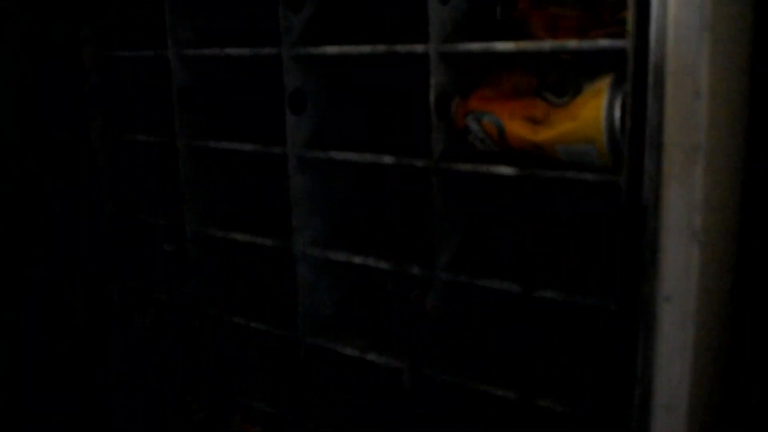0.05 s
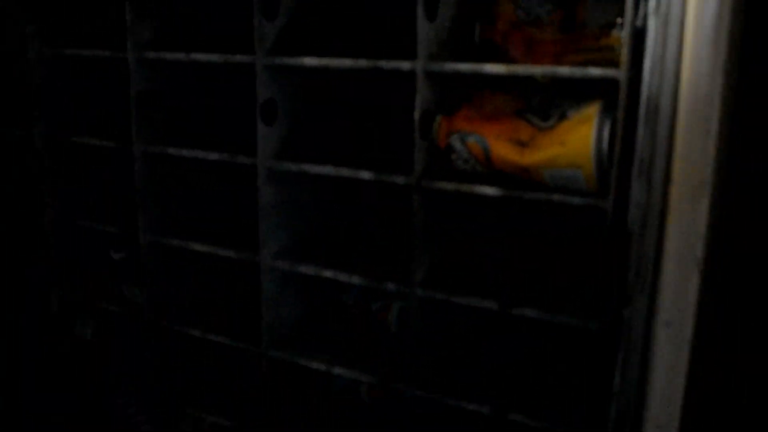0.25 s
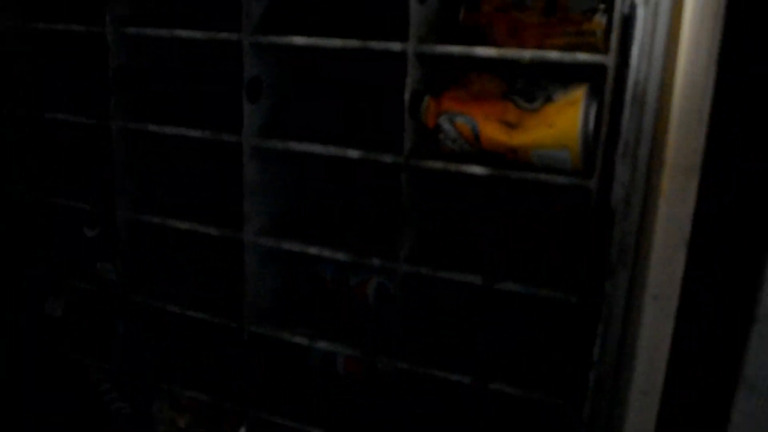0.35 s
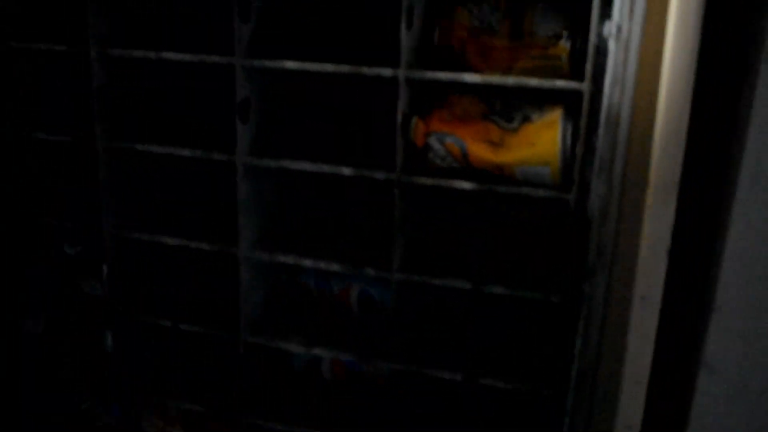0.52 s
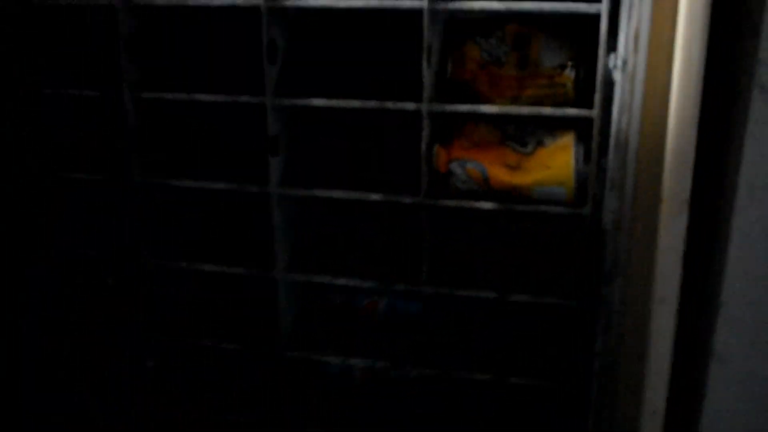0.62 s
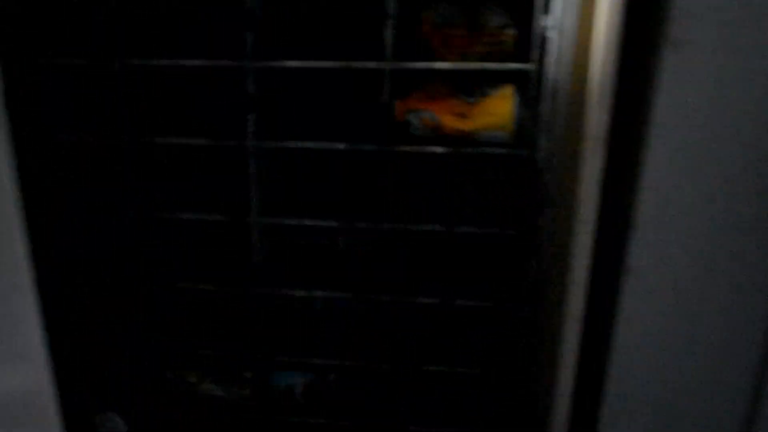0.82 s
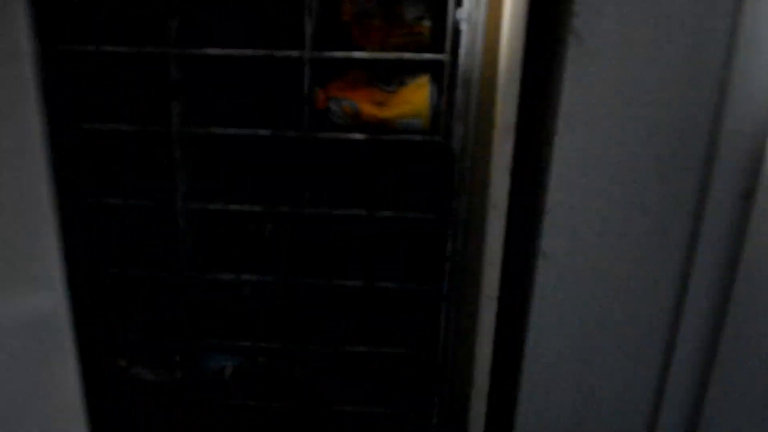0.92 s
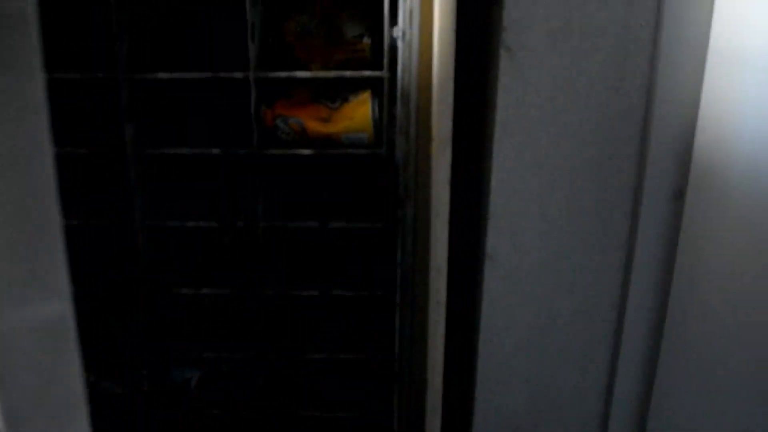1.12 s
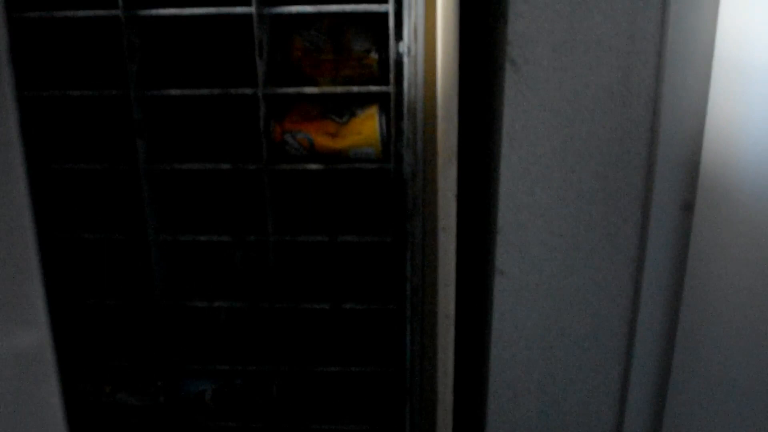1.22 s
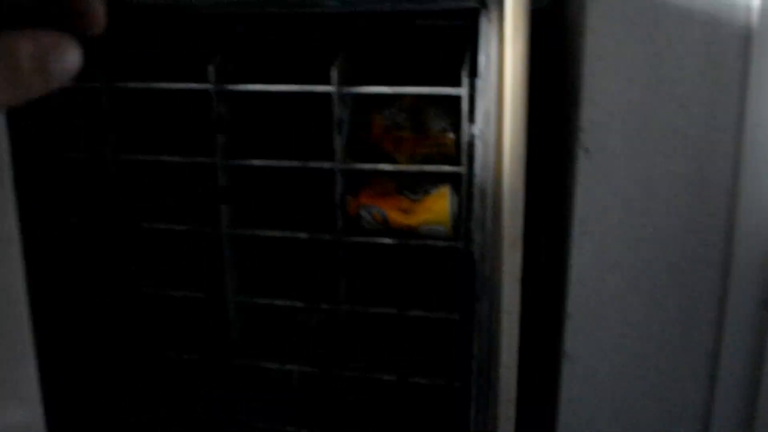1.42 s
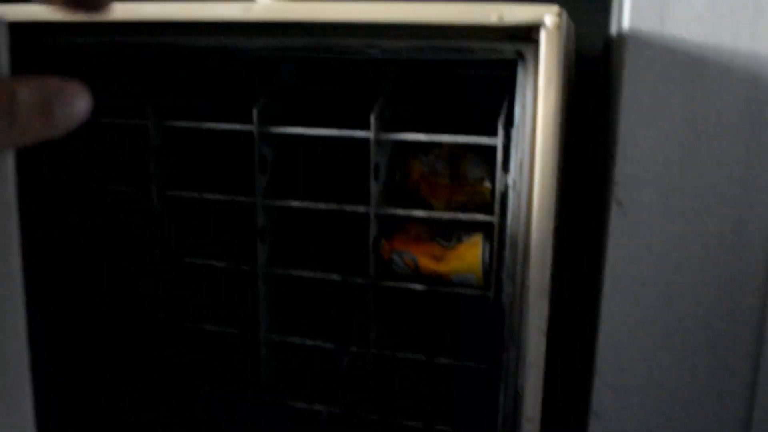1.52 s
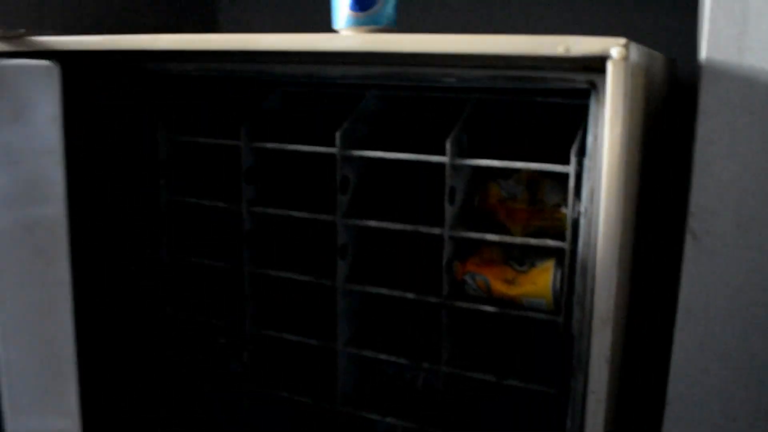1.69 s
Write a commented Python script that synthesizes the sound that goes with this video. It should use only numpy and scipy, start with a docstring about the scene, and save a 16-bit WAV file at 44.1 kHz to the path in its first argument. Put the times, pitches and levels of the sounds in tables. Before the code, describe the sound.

Two ringing clanks from a metal cabinet door break into a quick clatter, with a rattling wire rack and a low rumble. The rack then knocks lightly and the door taps softly, dying away in a big empty room.

```python
"""A sheet-metal cabinet door is knocked twice and chatters against its frame, each blow making it ring.
From the first knock on, the wire rack inside rattles, and high metallic tinks come now and then.
After about a second the rack knocks on its rail, and the held door gives soft, hollow taps.
A large bare room rings after it all, over the low rumble of the shaking cabinet and a faint hiss."""
import sys
import numpy as np
from scipy import signal
from scipy.fft import rfft, irfft, next_fast_len
from scipy.io import wavfile
from scipy.ndimage import uniform_filter1d

SR = 44100
rng = np.random.default_rng(int(sys.argv[2]) if len(sys.argv) > 2 else 0)


def wrap_up_sound(samples):
    """Save the sound to the file named by the first command line argument, as 16-bit audio."""
    columns = np.atleast_2d(samples).T
    # keep every value between -1 and 1, then stretch to whole-number steps
    tamed = np.clip(columns, -1, 1)
    steps = np.round(tamed * 32767).astype(np.int16)
    wavfile.write(sys.argv[1], SR, steps)


N = 77175
ATTACK_S = 0.00098  # how fast clatter and rail knocks start
SCATTER_DB = 1.5  # how much a tone's level varies from hit to hit


def door_ring(blows):
    """Each blow rings the door's own tones; touching the frame or hand stops low tones soonest."""
    # For each tone: pitch in Hz, level in dB, fade time (t60, the seconds it takes to drop 60 dB).
    door_hz = [241, 521, 633, 874, 1001, 1076, 1231, 1440, 1494, 1577, 1698, 1797, 1844, 1911, 1961, 2076,
               2459, 3890]
    door_db = [-11.5, 1.5, 5.5, -0.5, -2.5, 1.5, -1.5, -10.5, -10, -3.5, 2.5, -2.5, 2.5, -12.5, -3, 0, -14,
               -9]
    door_t60 = [0.14, 0.058, 0.7, 0.25, 0.13, 0.068, 1, 0.71, 0.99, 0.2, 0.15, 0.17, 0.15, 0.57, 0.1, 0.11,
                0.25, 0.07]
    # The two borders between low, middle and high tones, in Hz.
    borders_hz = [750, 1750]
    out, t = np.zeros(N), np.arange(SR // 4) / SR
    hz, db, t60 = np.array([door_hz, door_db, door_t60])[:, :, None]
    tones = amp(db - 60 * t / t60) * np.sin(2 * np.pi * hz * t) * np.sqrt(1 - t / t.max())
    band = np.searchsorted(borders_hz, door_hz)
    loss = (hz / borders_hz[0]) ** -0.96 * t
    for start, *band_db, _, damping, spot_hz in blows:
        # The spot that is struck lifts the tones near one pitch.
        lift_db = 10 * np.exp(-(np.log2(hz[:, 0] / spot_hz) / .025) ** 2)
        gains = amp(np.array(band_db)[band] + lift_db + SCATTER_DB * rng.standard_normal(len(hz)))
        rise_cycles = 0.11 + 0.61 * abs(max(band_db))  # softer blows swell more slowly
        rise = 1 - np.exp(-t * hz / rise_cycles)
        add(out, start, gains @ (tones * amp(-damping * loss) * rise))
    return out


def door_clatter(blows):
    """Each blow also wakes its own mix of tones, packed so closely that they sound like noise."""
    # Each row: frequency in Hz, level of the clatter in dB.
    spectrum = [(130, -52), (250, -16), (420, -16), (620, -2), (1200, -5), (1870, -3.5), (2600, -3.5),
                (4050, -7.5), (7000, -20.5), (15000, -52.5)]
    # Each row: frequency in Hz, fade time in seconds.
    fade_times = [(200, 0.12), (1500, 0.45), (5000, 0.15), (14000, 0.47)]
    out, t = np.zeros(N), np.arange(SR // 4) / SR
    bursts = noise(spectrum, (len(blows), len(t)))
    bursts = unit(filtered(bursts, lambda hz: amp(5 * wobble((len(blows), len(hz)), width=8))))
    bursts = fade_bands(bursts, fade_times) * (1 - np.exp(-t / ATTACK_S))
    for (start, *_, clatter_db, _, _), burst in zip(blows, bursts):
        add(out, start, amp(clatter_db) * burst)
    return out


def door():
    """The door is knocked and bounces on its frame, giving a ring and a clatter."""
    # Each row: start in seconds, strength of the low, middle and high tones in dB, clatter in dB,
    # extra fading from contact in dB per second at 750 Hz, lifted pitch in Hz.
    blows = [(.2005, -7, -22, -28, -20, 500, 521), (.211, -9, -27.5, -18.5, -25, 120, 874),
             (.239, -12.5, -19.5, -13.5, -22, 114, 1820), (.262, -33, -25, -18, -31, 152, 1860),
             (0.284, -15.5, -38.5, -21, -39.5, 152, 1231), (.361, -48, -28.5, -39, -50, 397, 633),
             (0.412, -47, -30, -37, -31.5, 300, 1844), (.4355, -13.5, -15.5, -6.5, -10, 617, 1076),
             (.458, -32.5, -13, -14, -18.5, 305, 1844), (.478, -29, -17, -26, -21, 300, 874),
             (.5, -12.5, -15, -10.5, -17.5, 395, 1961), (.522, -57, -17.5, -19, -24, 300, 1844),
             (.546, -16, -14.5, -16.5, -21.5, 195, 1001), (.577, -16, -15, -22.5, -26.5, 151, 1001),
             (.6, -13, -21.5, -21.5, -26, 294, 1577), (0.62, -45, -33, -27, -35, 304, 1231),
             (.645, -30.5, -26, -56, -36, 200, 1540), (.67, -38.5, -28, -47, -46, 153, 633),
             (.731, -52, -41, -44, -38.5, 196, 2076), (.762, -28, -31, -59, -39, 307, 1001),
             (.803, -62, -42, -58, -34.5, 214, 874)]
    return door_ring(blows), door_clatter(blows)


def door_taps():
    """Soft taps on the held door swell into three hollow tones; the hand shifts the lower two."""
    # Each row: start in seconds, level in dB, dB added to tones two and three, first two pitches in Hz.
    taps = [(1.098, -29.5, -5.5, 648, 926), (1.18, -32.5, -20, 492, 1047), (1.222, -33.5, -33, 650, 900),
            (1.243, -30, -9, 650, 898), (1.436, -31, -3.5, 666, 897), (1.547, -35.5, -27, 653, 922),
            (1.573, -36, -11, 634, 485), (1.716, -40, 4.5, 615, 946)]
    out, t = np.zeros(N), np.arange(SR // 4) / SR
    rise = 1 - np.exp(-(t / 0.0054) ** 2)
    for start, level_db, others_db, first_hz, second_hz in taps:
        db = level_db + np.array([4.5, 6.5 + others_db, -5 + others_db])
        add(out, start, ring([first_hz, second_hz, 1229], db, t60=[0.059, 0.058, 0.37], t=t) * rise)
    return out


def wire_rattles():
    """The rack's wires rattle: grainy noise that holds for a moment, then fades."""
    # Each row: start in seconds, level in dB, hold and fade times in seconds, tilt in dB per octave.
    rattles = [(0.202, -26.5, 0.003, 0.39, -5.5), (0.368, -38.5, .01, 1, -7),
               (0.442, -19.5, 0.0045, 0.078, -7), (0.546, -42, 0.024, 0.15, 6),
               (0.619, -32.5, 0.0068, 0.13, -3), (0.667, -31.5, 0.018, 0.25, -1.5),
               (0.724, -29.5, 0.01, 0.19, -8), (0.792, -34.5, 0.029, 0.27, -0.5),
               (0.837, -52, 0.0077, 0.12, -12), (0.883, -40, 0.019, 0.32, -8.5),
               (0.922, -36.5, 0.0017, 0.13, -2), (0.971, -43.5, 0.0044, 0.12, -4),
               (1.376, -53, 0.013, 0.23, -2), (1.407, -42.5, 0.025, 0.093, -9)]
    # Each row: frequency in Hz, level of the rattle in dB.
    spectrum = [(1500, -4.5), (3200, -4), (7000, -3), (11600, -7.5), (15800, -17)]
    out, t = np.zeros(N), np.arange(SR // 6) / SR
    for start, db, hold, t60, tilt_db in rattles:
        grain = amp(2.5 * wobble(len(t), width=60))
        loudness = amp(db - 60 * np.maximum(t - hold, 0) / t60) * (1 - np.exp(-t / 0.0014))
        add(out, start, loudness * unit(grain * noise(spectrum, len(t), tilt_db)))
    return out


def rail_knocks():
    """The rack knocks on its rail: a few ringing tones and a short burst of noise."""
    # Each row: start in seconds, level in dB.
    knocks = [(1.015, -29.5), (1.081, -26.5), (1.182, -32.5), (1.296, -38.5), (1.386, -34.5), (1.487, -39),
              (1.585, -43)]
    # Each row: pitch of a rail tone in Hz, relative level in dB, fade time in seconds.
    tones = [(463, -5, 0.094), (980, -10, 0.7), (2094, -6, 0.16), (3393, 1, 0.065), (5160, -18, 0.057)]
    # Each row: frequency in Hz, level of the burst in dB.
    spectrum = [(200, -10), (900, -10), (2100, -7.5), (2700, -11.5), (3410, -11), (4550, -16),
                (15000, -40.5)]
    out, t = np.zeros(N), np.arange(SR // 6) / SR
    for start, db in knocks:
        ringing = .5 * ring(*np.transpose(tones), t)
        burst = amp(-4.5 - 60 * t / 0.19) * noise(spectrum, len(t))
        add(out, start, amp(db) * (ringing + burst) * (1 - np.exp(-t / ATTACK_S)))
    return out


def metal_tinks():
    """High metallic tinks, the first two from the door's blow, each a click and a fluttering tone."""
    # Each row: start in seconds, tone level in dB, pitch in Hz, fade time in seconds, click in dB.
    tinks = [(.239, -23, 3947, 0.2, -47), (0.242, -26.5, 4360, 0.11, -47), (0.841, -43, 14450, 0.11, -27.5),
             (1.193, -44.5, 6900, 0.099, -60), (1.194, -41, 10600, 0.03, -52),
             (1.2264, -38, 11300, 0.023, -71), (1.2272, -35, 9300, 0.0073, -41),
             (1.228, -57, 14450, .2, -70), (1.311, -40.5, 5030, 0.014, -40),
             (1.353, -47, 14500, .06, -39.5)]
    out, t = np.zeros(N), np.arange(SR // 6) / SR
    for start, db, hz, t60, click_db in tinks:
        click = amp(click_db - 60 * t / 0.018) * noise([(4000, 0.011), (15000, 0)], len(t))
        flutter = 1 + 0.6 * wobble(len(t), width=90)
        add(out, start, ring(hz, db, t60, t) * flutter + click)
    return out


def room_echo(x):
    """The bare room gives each stretch of sound its own long tail, where low notes last longest."""
    # Each row: frequency in Hz, fade time in seconds.
    fade_times = [(350, 2.33), (1000, 1.49), (4000, 0.63), (12000, 0.48)]
    out, step = np.zeros(N), SR // 5
    starts = range(0, N, step)
    tails = fade_bands(rng.standard_normal((len(starts), SR)), fade_times)
    for i, tail in zip(starts, tails):
        add(out, i / SR + 0.01, signal.fftconvolve(x[i:i + step], tail / np.linalg.norm(tail)))
    return out


def cabinet_rumble():
    """A low rumble swells and fades each time the cabinet shakes."""
    # Each row: start in seconds, level in dB.
    shakes = [(0.198, -35.5), (.395, -46.5), (.55, -53), (.62, -35.5), (0.763, -35), (1.031, -49),
              (1.2, -49)]
    # Each row: frequency in Hz, level of the rumble in dB.
    spectrum = [(45, -13), (70, 5.5), (110, -3), (230, 6.5), (400, 12), (600, -34)]
    swell = np.zeros(N)
    for start, db in shakes:
        age = np.maximum(np.arange(N) / SR - start, 0)
        swell += amp(db - 60 * age / 0.25) * (1 - np.exp(-age / 0.006))
    return swell * noise(spectrum, N)


def room_hiss():
    """The faint, steady noise of the room."""
    # Each row: frequency in Hz, relative level in dB.
    spectrum = [(60, -10), (150, -14.5), (350, 1.5), (700, -1.5), (1300, -1.5), (2700, -10.5),
                (5000, -14.5), (10000, -21), (15700, -36)]
    return amp(-50) * noise(spectrum, N)


def amp(db):
    """Turn decibels into a factor to multiply by."""
    return 10 ** (np.asarray(db) / 20)


def unit(x):
    """Scale x to an average (rms) level of 1."""
    return x / np.sqrt(np.mean(x ** 2) + 1e-20)


def wobble(size, width):
    """Random ups and downs, smoothed over width points."""
    return unit(uniform_filter1d(rng.standard_normal(size), size=width))


def along(points, hz):
    """Read between (Hz, value) points, with octaves evenly spaced."""
    point_hz, values = np.transpose(points)
    return np.interp(np.log(hz + 1), np.log(point_hz + 1), values)


def filtered(x, response):
    """Multiply each frequency in x by response(hz)."""
    size = next_fast_len(x.shape[-1] + 1024)
    gains = response(np.fft.rfftfreq(size, 1 / SR))
    return irfft(rfft(x, size) * gains, size)[..., :x.shape[-1]]


def noise(spectrum, size, tilt_db=0):
    """Noise shaped by (Hz, dB) points, falling away below the first; upward tilt brightens it."""
    def response(hz):
        db = along(spectrum, hz) + tilt_db * np.log2((hz + 1) / 6000)
        return amp(db) / (1 + (spectrum[0][0] / (hz + 1)) ** 4)
    return unit(filtered(rng.standard_normal(size), response))


def fade_bands(x, fade_times):
    """Let each frequency band of x fade at its own speed."""
    hz, t, bands = signal.stft(x, SR, nperseg=256)
    t60 = np.maximum(along(fade_times, hz), .01)[:, None]
    return signal.istft(bands * amp(-60 * t / t60), SR, nperseg=256)[1][..., :x.shape[-1]]


def ring(hz, db, t60, t):
    """Fading tones, each a little louder or softer on every hit."""
    hz, db, t60 = (np.atleast_1d(v)[:, None] for v in (hz, db, t60))
    db = db + SCATTER_DB * rng.standard_normal(hz.shape)
    return (amp(db - 60 * t / t60) * np.sin(2 * np.pi * hz * t)).sum(0)


def add(out, start, x):
    """Mix x into out, beginning at start seconds."""
    part = out[round(start * SR):][:len(x)]
    part += x[:len(part)]


def scene():
    """Mix the door, the rack and the room into one channel."""
    ringing, clatter = door()
    jangle = rail_knocks() + wire_rattles() + metal_tinks()
    ringing += door_taps()
    # The door's ring fills the room less than its clatter does.
    echo = amp(-13.5) * room_echo(amp(-19.5) * ringing + clatter + jangle)
    return (ringing + clatter + jangle + echo + room_hiss() + cabinet_rumble())[None]


def record(dry):
    """Round off the loudest peaks, then trim the deepest bass and the highest treble."""
    ceiling, hardness = 1.05, 6
    low_cut_hz, top_hz = 60, 15760
    x = dry[0] / (1 + np.abs(dry[0] / ceiling) ** hardness) ** (1 / hardness)
    x = signal.sosfilt(signal.butter(2, low_cut_hz, "highpass", fs=SR, output="sos"), x)
    return filtered(x, lambda hz: hz < top_hz)[None]


dry = scene()
out = record(dry)
wrap_up_sound(out)
```